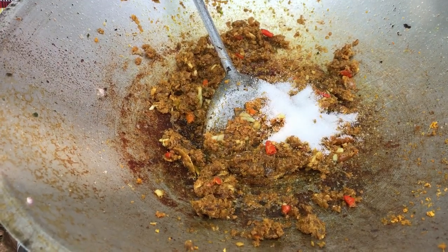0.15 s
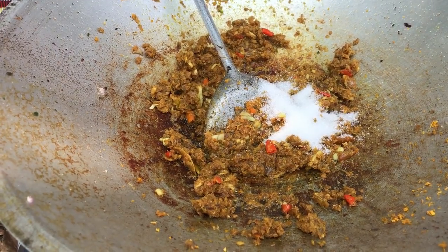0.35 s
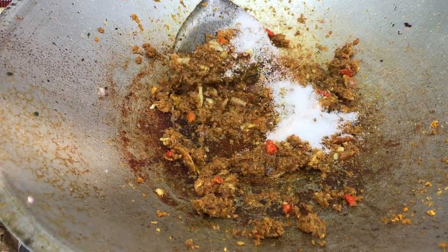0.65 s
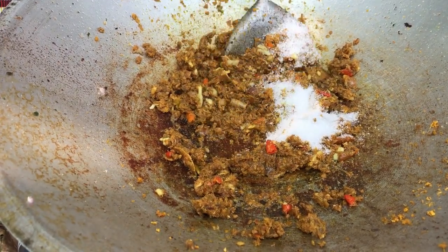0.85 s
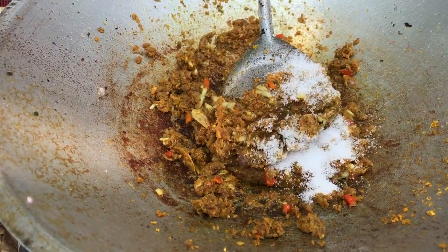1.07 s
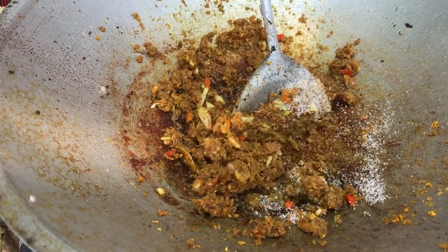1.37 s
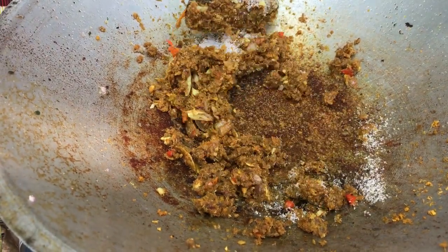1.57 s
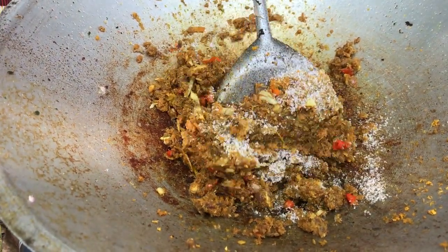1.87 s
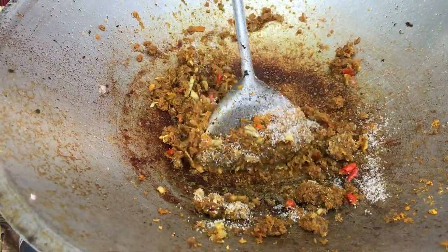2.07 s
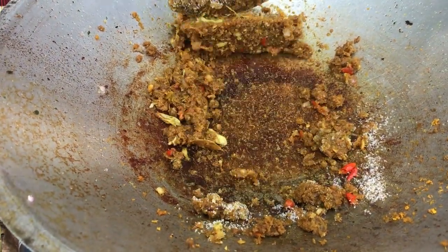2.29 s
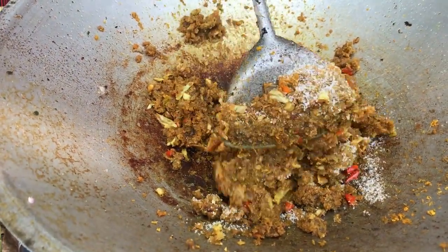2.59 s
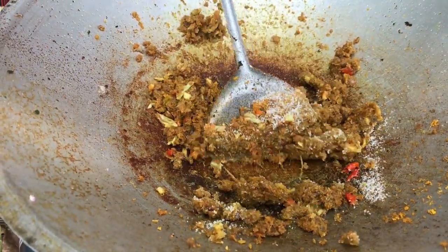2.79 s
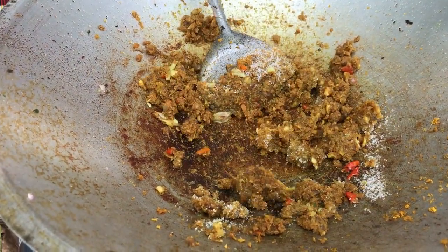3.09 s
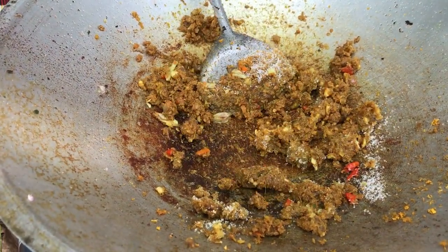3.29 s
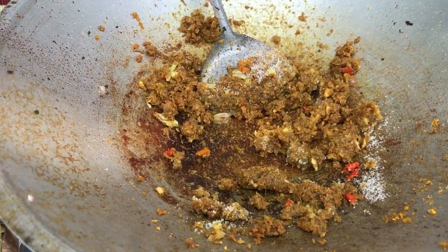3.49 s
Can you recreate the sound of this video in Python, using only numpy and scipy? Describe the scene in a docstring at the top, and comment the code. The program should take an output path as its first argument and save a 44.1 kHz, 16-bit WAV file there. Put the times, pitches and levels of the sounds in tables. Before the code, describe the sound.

A metal spatula clanks and scrapes in a steel wok, heard close. A light blade tap comes at 0.1 s, a ringing clank at 0.45, then gritty strokes with knocks near 0.9, 1.3, 1.6, 2.0 and 2.4, a softer scrape around 2.8, and the loudest clattering clank at 3.1, dying into faint sizzle and burner rumble. Barely audible distant bird chirps and a late trill.

```python
"""Kitchen, close to a steel wok on a burner: a metal spatula stirs a frying paste.
Blade blows, chatter and taps are clicks into resonant modes; scrape and drag are coloured random grains.
Sizzle is denser grains, bright ticks are short rung cracks, soft knocks are noise puffs, the burner is low noise.
Far off, a bird chirps as gliding sines and something trills as a repeated ringing note."""
import sys
import numpy as np
from scipy import signal
from scipy.fft import rfft, irfft
from scipy.io import wavfile

SR = 44100
rng = np.random.default_rng(int(sys.argv[2]) if len(sys.argv) > 2 else 0)


def output_pcm(signal):
    """Save a mono or channel-first signal as 16-bit PCM at the path in sys.argv[1].

    Samples are clipped to [-1, 1] before scaling.
    """
    pcm = np.clip(np.atleast_2d(signal).T, -1, 1) * 32767
    wavfile.write(sys.argv[1], SR, np.round(pcm).astype(np.int16))


N = 160965

# burner, spectrum shape: pitch_hz, density_db
RUMBLE_SPECTRUM = [(25,-2),(45,5.5),(70,9),(95,-1.5),(133,-4.5),(200,-20.5),(280,-28.5)]
# frying and burner over time: time_s, treble_db, middle_db, rumble_db
FRY_LEVELS = [(0,-41.5,-41,-40),(.4,-45,-40.5,-36),(.7,-39,-41,-44),(1.0,-43.5,-44.5,-40.5),(1.55,-40,-43.5,-38),(1.8,-42.5,-49.5,-43.5),(1.97,-47,-48,-37.5),
              (2.25,-40.5,-41.5,-37),(2.36,-39.5,-46.5,-44),(2.58,-46.5,-54,-37),(2.95,-37,-46.5,-44.5),(3.2,-56,-56,-49),(3.35,-41.5,-48,-36),(3.65,-43.5,-47.5,-37.5)]
# far bird: start_s, length_s, from_hz, to_hz, level_db
CHIRPS = [(0.268, .055, 5400, 3400, -45), (3.2, .17, 4000, 6900, -52)]
# far trill over time: time_s, drive_db
TRILL_DRIVE = [(2.3, -76), (2.6, -51), (3.2, -60.5), (3.65, -57)]
TRILL_HZ, TRILL_MID_RATE_HZ, TRILL_STAGE_T60_S = 945, 24, .022

# sizzle, treble spectrum shape: pitch_hz, density_db
SIZZLE_TREBLE = [(5500,-7.5),(7500,-4.5),(9500,0.5),(10600,-3),(12000,4),(14300,3),(16200,1)]
# sizzle, middle spectrum shape: pitch_hz, density_db
SIZZLE_MIDDLE = [(300,-18.5),(450,-36.5),(800,-17),(1200,-9),(1700,-0.5),(2400,-2),(3500,0),(4600,-5.5),(6000,-5)]
FIZZ_PER_S, FIZZ_SPREAD_DB = 9000, 3.5
# short bright ticks, from small blade knocks, grit snaps and oil spits: start_s, level_db, pitch_hz
TICKS = [(0.604, -11, 3300), (0.6639, -10, 6760), (0.6807, -10, 3250), (1.3769, -8, 3650),
         (1.672, -14, 3400), (1.6986, -8.5, 2820), (1.7076, -4.5, 3220), (2.489, -12, 4450),
         (2.5142, -9.5, 6300), (2.707, -13, 5600), (2.9053, -17, 3260), (3.3633, -17.5, 3000)]
TICK_T60_CYCLES, TICK_CRACK_DB = 6.4, 3
# soft dull knocks on the wok: start_s, level_db, centre_hz
SOFT_KNOCKS = [(1.075,-34.5,815),(1.437,-36.5,800),(1.715,-36,1530),(1.865,-38.5,830),(2.141,-37,806),(2.231,-38,1440),(2.739,-36.5,604),(2.837,-32,820)]
KNOCK_FALL_S, KNOCK_BASS_HZ, KNOCK_BASS_DB = .021, 245, -0.5

# blade strokes over time: time_s, scrape_db, drag_db
STROKE_LEVELS = [(.72,-52,-54),(.8,-40.5,-54),(.87,-34,-36.5),(.91,-25,-26),(1.0,-40,-44),(1.28,-70,-50.5),(1.31,-27.5,-27),(1.4,-28,-49.5),(1.47,-39.5,-50),
                 (1.61,-60,-45),(1.64,-25.5,-28),(1.72,-27.5,-48),(1.78,-37.5,-50),(1.82,-53,-49),(2.0,-40,-52),(2.03,-34,-26),(2.12,-30,-52.5),(2.19,-35.5,-52.5),(2.36,-61,-51),
                 (2.4,-25.5,-33.5),(2.52,-35,-44.5),(2.57,-46.5,-48),(2.72,-44.5,-46),(2.78,-32,-41.5),(2.85,-31,-44),(3.0,-44,-51),(3.06,-45,-53)]
# grit on steel, spectrum shape: pitch_hz, density_db
SCRAPE_SPECTRUM = [(1200,-23),(1830,-8.5),(2300,-4.5),(3290,6),(4200,2.5),(4860,0.5),(8820,-2.5),(10500,-11.5),(13500,-5),(15900,-7.5)]
# pushed paste, spectrum shape: pitch_hz, density_db
DRAG_SPECTRUM = [(140,5),(236,6),(418,-3.5),(700,-2.5),(1000,-7),(1500,-11)]
GRIT_MID_PER_S, GRIT_SPREAD_DB = 4500, 4.6

# taps on the blade alone: start_s, level_db
TAPS = [(0.1124, -4), (0.1204, -12.5), (0.1269, -12.5)]
# blade modes: pitch_hz, level_db, t60_s
BLADE_MODES = [(1107, -27.5, .1), (1600, -2.5, 0.01), (2330, -2, 0.035), (4210, -0.5, 0.036),
               (5330, -11, 0.2), (6360, 1.5, 0.01), (7800, -23, 0.065), (8930, -18, 0.061)]
BLADE_DB = -8.5
# faint long rings of the metal: start_s, level_db, pitch_hz
HUMS = [(.46, -45, 794), (0.461, -31, 1542), (1.63, -44, 797), (1.71, -43.5, 798), (2.45, -43, 794)]
HUM_T60_CYCLES, HUM_RISE_S = 750, 0.0054

# blade meets wok: start_s, level_db, thud_db, low_middle_db, low_middle_hz, treble_db, chatter_s, long_ring_db
BLOWS = [(.452,-5,-55,7.5,1800,-11,0.01,11),(0.46,-3,-50,2,1620,-6,0.017,5),(0.902,-3.5,-12,-16,1200,1,0.0022,-30),(1.295,-4,3,0,1670,2.5,0.0027,-2),(1.314,-11,-16,-13,1000,-2,0.012,3),(1.352,-5,-37,-16,1600,-6,0.004,-26),
         (1.617,3,-9.5,5,1260,-3.5,0.0055,2.5),(1.64,-5,-9.5,-4,1000,-5,0.013,2),(1.686,-3,-23,-9,1900,0,0.0029,0),
         (1.999,6.5,-14,-15,1680,0.5,0.0092,-1),(2.052,-11.5,-10,1.5,1500,-1,0.0056,-18),(2.367,8,-15.5,1.5,1000,-1,0.0077,-4),(2.377,2.5,-39,0.5,970,-14,0.0036,6),(2.42,-4.5,-21,-9,1500,0,0.0051,-10),
         (3.076,9.5,-27,-6,1170,-1.5,0.0039,4),(3.086,7,-30,1,1300,-7.5,0.014,-1.5),(3.104,4,-34,-1,1580,-9.5,0.016,2.5)]
# long modes of the bowl: pitch_hz, level_db, t60_s
WOK_MODES = [(235.7,-9.5,0.23),(450,-19.5,0.39),(696,-11,0.2),(885,-6,0.22),(989,-4.5,0.17),(1250,-22,0.2),(1335,-12,0.19),(1767,-0.5,0.14),(2550,-6,0.14),(2870,-2.5,0.15),(3000,-23,0.23),(3515,0.5,0.14),(4010,-3,0.096)]
# crowded short modes, level by pitch: pitch_hz, level_db
CLANK_LEVELS = [(700,-14),(1750,-8.5),(2300,-11.5),(2900,-6.5),(3650,3),(4300,-2),(5000,-9.5),(6600,-1),(9000,-10),(16000,-9)]
# crowded short modes, decay by pitch: pitch_hz, t60_s
CLANK_T60 = [(1000, 0.05), (3500, 0.046), (6000, 0.044), (12000, 0.012)]
# bowl yielding under the blow: pitch_hz, level_db, t60_s
THUD_MODES = [(202,-6.5,0.0085),(405,0.5,0.011),(663,-4,0.029)]
CHATTER_PER_S, THUD_LAG_S = 1500, 0.0014
CLANK_DB, RING_DB = -6, -25
MIDDLE_TOP_HZ, TREBLE_FROM_HZ = 2000, 5200
MIDDLE_FALL_DB = 10  # one octave from the centre; grows with octaves squared

OVERLOAD_CEILING, STOPBAND_HZ = 2.07, 16400


def from_db(db):
    """Decibels to amplitude."""
    return 10 ** (np.asarray(db) / 20)


def rms_one(x):
    """Scale to rms 1."""
    return x / np.sqrt(np.mean(x ** 2) + 1e-20)


def in_time(rows):
    """Draw each column as straight lines over time."""
    time_s, *columns = np.transpose(rows)
    return [np.interp(np.arange(N) / SR, time_s, column) for column in columns]


def at_hz(points, hz):
    """Read a table at hz, linear in log frequency."""
    points = np.array(points)
    return np.interp(np.log(hz), np.log(points[:, 0]), points[:, 1])


def drift(rate_hz):
    """Slow random wander of spread 1: two-pole lowpassed noise, computed every 40 samples."""
    r = np.exp(-80 * np.pi * rate_hz / SR)
    white = rng.standard_normal(N // 40 + 2002)
    slow = signal.lfilter([1], [1, -2 * r, r * r], white)[2000:]  # settled part
    return np.interp(np.arange(N) / 40, np.arange(len(slow)), rms_one(slow - slow.mean()))


def ring(drive, hz, t60_s):
    """Two-pole resonator: a unit click starts a decaying sine of height 1."""
    r = from_db(-60 / (max(t60_s, .0005) * SR))
    w = 2 * np.pi * hz / SR
    return signal.lfilter([0, np.sin(w)], [1, -2 * r * np.cos(w), r * r], drive + 1e-18)


def colour(x, spectrum):
    """Filter by a spectrum that falls as the cube of frequency beyond its ends; rms 1."""
    hz = np.maximum(np.arange(N // 2 + 1) * SR / N, 1)
    low_hz, high_hz = spectrum[0][0], spectrum[-1][0]
    beyond = np.minimum(hz / low_hz, 1) ** 3 * np.minimum(high_hz / hz, 1) ** 3
    return rms_one(irfft(rfft(x) * from_db(at_hz(spectrum, hz)) * beyond, N))


def grains(per_s, spread_db):
    """Random clicks of uneven size and either sign."""
    size_db = spread_db * np.minimum(rng.exponential(1, N), 4)
    sizes = from_db(size_db) * rng.choice([-1, 1], N)
    return sizes * (rng.random(N) < per_s / SR)


def rumble():
    """Lumpy low roar of the burner: coloured noise with a wandering level."""
    level_db = in_time(FRY_LEVELS)[2] + 2 * drift(3)
    return from_db(level_db) * colour(rng.standard_normal(N), RUMBLE_SPECTRUM)


def chirps():
    """Faint bird whistles: sines gliding linearly in pitch."""
    out = np.zeros(N)
    for start_s, length_s, from_hz, to_hz, level_db in CHIRPS:
        n, i = int(length_s * SR), int(start_s * SR)
        phase = 2 * np.pi * np.cumsum(np.linspace(from_hz, to_hz, n)) / SR
        out[i:i + n] += from_db(level_db) * np.sqrt(np.hanning(n)) * np.sin(phase)
    return out


def trill():
    """Soft note repeating at a wandering rate: clicks through two equal resonators."""
    drive_db, = in_time(TRILL_DRIVE)
    rate_hz = TRILL_MID_RATE_HZ * from_db(2 * drift(4.04))
    beats = np.diff(np.floor(np.cumsum(rate_hz) / SR), prepend=0)
    beats = beats * (np.arange(N) > TRILL_DRIVE[0][0] * SR)
    once = ring(beats * from_db(drive_db - 19), TRILL_HZ, TRILL_STAGE_T60_S)
    return ring(once, TRILL_HZ, TRILL_STAGE_T60_S)  # second stage softens the onset


def sizzle():
    """Dense tiny bursts of steam in the oil: one grain stream, coloured in two bands."""
    treble_db, middle_db, _ = in_time(FRY_LEVELS)
    fizz = grains(FIZZ_PER_S, FIZZ_SPREAD_DB)
    treble = from_db(treble_db + 1.9 * drift(22)) * colour(fizz, SIZZLE_TREBLE)
    middle = from_db(middle_db + 0.3 * drift(14.0)) * colour(fizz, SIZZLE_MIDDLE)
    return treble + middle


def ticks():
    """Small blade knocks, grit snaps and oil spits: a three-sample crack plus a few cycles of ring."""
    out = np.zeros(N)
    for start_s, level_db, hz in TICKS:
        i, crack = int(start_s * SR), np.zeros(400)
        crack[:3] = np.array([1, -2, 1]) * from_db(TICK_CRACK_DB) / 2
        body = ring(np.eye(1, 400)[0], hz, TICK_T60_CYCLES / hz)
        out[i:i + 400] += from_db(level_db) * (crack + body)
    return signal.sosfilt(signal.butter(3, 1400, "high", fs=SR, output="sos"), out)


def soft_knocks():
    """Soft dull knocks on the wok: puffs of band noise with a low bowl mode."""
    out, t = np.zeros(N), np.arange(4000) / SR
    envelope = np.minimum(t / 0.0085, 1) * np.exp(-(t / KNOCK_FALL_S) ** 2)
    for start_s, level_db, hz in SOFT_KNOCKS:
        i, white = int(start_s * SR), rng.standard_normal(4000)
        band = signal.butter(2, [hz * 0.9, hz * 1.12], "band", fs=SR, output="sos")
        puff = rms_one(signal.sosfilt(band, white))
        bass = from_db(KNOCK_BASS_DB) * rms_one(ring(white, KNOCK_BASS_HZ, 0.026))
        out[i:i + 4000] += from_db(level_db) * (puff + bass) * envelope
    return out


def scraping():
    """Clumps of grit under the moving blade; the same grains, darker, are the paste dragged along."""
    scrape_db, drag_db = in_time(STROKE_LEVELS)
    grit = grains(GRIT_MID_PER_S * from_db(1.6 * drift(43)), GRIT_SPREAD_DB)
    scrape = from_db(scrape_db + 2 * drift(36)) * colour(grit, SCRAPE_SPECTRUM)
    drag = from_db(drag_db) * colour(grit * from_db(2.1 * drift(33)), DRAG_SPECTRUM)
    return scrape + drag


def taps():
    """The free blade rings at its own modes, with alternating signs."""
    start_s, level_db = np.transpose(TAPS)
    clicks = np.zeros(N)
    clicks[(start_s * SR).astype(int)] = from_db(level_db + BLADE_DB)
    return sum((-1) ** k * from_db(mode_db) * ring(clicks, hz, t60_s)
               for k, (hz, mode_db, t60_s) in enumerate(BLADE_MODES))


def hums():
    """Pure metal tones that swell quickly and die slowly."""
    out = np.zeros(N)
    for start_s, level_db, hz in HUMS:
        t = np.maximum(np.arange(N) / SR - start_s, 0)
        decay = from_db(level_db - 60 * t * hz / HUM_T60_CYCLES)
        out += decay * (1 - np.exp(-t / HUM_RISE_S)) * np.sin(2 * np.pi * hz * t)
    return out


def chatter(length_s):
    """Each blow is a run of random contacts, weakening on average: delays after the first, signed forces."""
    steps = rng.exponential(1 / CHATTER_PER_S, (len(length_s), 60))
    after_s = np.cumsum(steps, axis=1) - steps[:, :1]
    fade = np.clip((np.maximum(length_s, .001)[:, None] - after_s) / .001, 0, 1)
    force = fade * rng.choice([-1, 1], after_s.shape) * rng.uniform(0.65, 1, after_s.shape)
    return after_s, force * np.exp(-1.2 * after_s / length_s[:, None])


def middle_fall_db(hz, centre_hz):
    """Level lost away from the centre of the low middle."""
    return -MIDDLE_FALL_DB * np.log2(hz / centre_hz) ** 2


def clank(where, force):
    """Crowded short modes: decaying noise bands, fresh for each blow, convolved with its contacts."""
    _, level_db, _, middle_db, middle_hz, treble_db, _, _ = np.transpose(BLOWS)
    size, edges_hz, crowd = 4096, np.geomspace(620, 16500, 26), 0
    t, bin_hz = np.arange(size) / SR, np.arange(1, size // 2 + 2) * SR / size
    white = rfft(rng.standard_normal((len(BLOWS), size)))
    pushes = rfft([np.bincount(at - at[0], push, size)[:size] for at, push in zip(where, force)])
    for low_hz, high_hz in zip(edges_hz, edges_hz[1:]):
        hz = np.sqrt(low_hz * high_hz)
        inside = np.abs(np.log(bin_hz / hz)) < np.log(high_hz / low_hz) / 2
        t60_s = at_hz(CLANK_T60, hz)
        decaying = irfft(white * inside, size) * from_db(-60 * t / t60_s)
        struck = irfft(rfft(decaying) * pushes, size)
        # energy set by decay time alone, whatever the contacts
        struck = struck * np.sqrt(t60_s * SR / 100 / (struck ** 2).sum(axis=1, keepdims=True))
        share_db = 0
        if hz < MIDDLE_TOP_HZ:
            share_db = middle_db + middle_fall_db(hz, middle_hz)
        elif hz > TREBLE_FROM_HZ:
            share_db = treble_db
        band_db = level_db + CLANK_DB + at_hz(CLANK_LEVELS, hz) + share_db
        crowd = crowd + from_db(band_db)[:, None] * struck
    out = np.zeros(N)
    for start, body in zip(where[:, 0], crowd):
        out[start:start + size] += body
    return out


def bowl_ring(where, force, after_s):
    """Long modes of the bowl, rung by every contact."""
    _, level_db, _, _, middle_hz, _, _, ring_db = np.transpose(BLOWS)
    out = np.zeros(N)
    for hz, mode_db, t60_s in WOK_MODES:
        # divide out how far the contacts add up or cancel at this pitch
        phasors = force * np.exp(2j * np.pi * hz * after_s)
        summed = np.abs(phasors.sum(axis=1)) + np.sqrt((force ** 2).sum(axis=1)) / 2
        in_middle = WOK_MODES[2][0] < hz < MIDDLE_TOP_HZ
        near_db = middle_fall_db(hz, middle_hz) if in_middle else 0
        gain = from_db(level_db + mode_db + RING_DB + ring_db + near_db) / summed
        clicks = np.zeros(N)
        np.add.at(clicks, where, force * gain[:, None])
        out = out + ring(clicks, hz, t60_s)
    return out


def thud():
    """The bowl yields just after first contact: short low modes with alternating signs."""
    start_s, level_db, thud_db = np.transpose(BLOWS)[:3]
    clicks = np.zeros(N)
    clicks[((start_s + THUD_LAG_S) * SR).astype(int)] = from_db(level_db + thud_db)
    body = sum((-1) ** k * from_db(mode_db) * ring(clicks, hz, t60_s)
               for k, (hz, mode_db, t60_s) in enumerate(THUD_MODES))
    return signal.sosfilt(signal.butter(4, 800, fs=SR, output="sos"), body)


def blows():
    """Blade on wok: chattering contacts wake the clank and the bowl; a thud lies below."""
    columns = np.transpose(BLOWS)
    start_s, length_s = columns[0], columns[6]
    after_s, force = chatter(length_s)
    where = ((start_s[:, None] + after_s) * SR).astype(int)
    out = clank(where, force) + bowl_ring(where, force, after_s) + thud()
    return signal.sosfilt(signal.butter(3, 120, "high", fs=SR, output="sos"), out)


def scene():
    """Sum of all sources, one channel."""
    background = rumble() + chirps() + trill()
    wok = sizzle() + ticks() + soft_knocks()
    spatula = scraping() + taps() + hums() + blows()
    return (background + wok + spatula)[None]


def record(dry):
    """The loudest peaks overload smoothly; a steep lowpass cuts the top; the output is clipped at 1."""
    hard = dry / (1 + np.abs(dry / OVERLOAD_CEILING) ** 6) ** (1 / 6)
    lowpass = signal.cheby2(20, 60, STOPBAND_HZ, fs=SR, output="sos")
    return np.clip(signal.sosfilt(lowpass, hard), -1, 1)


dry = scene()
out = record(dry)
output_pcm(out)
```